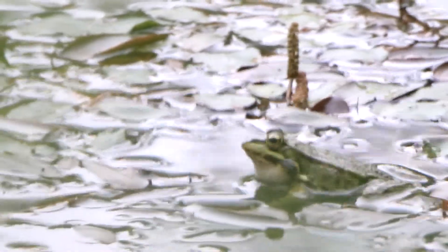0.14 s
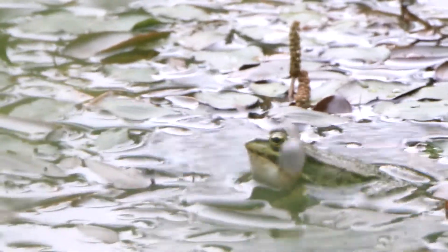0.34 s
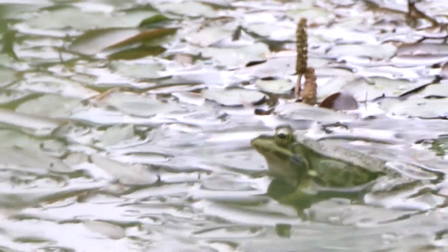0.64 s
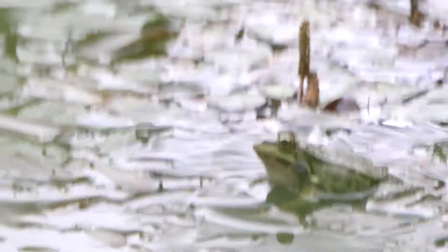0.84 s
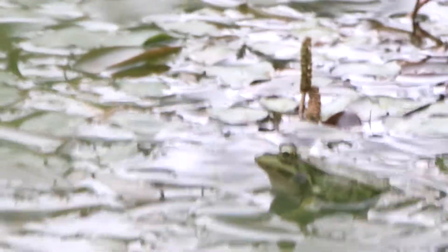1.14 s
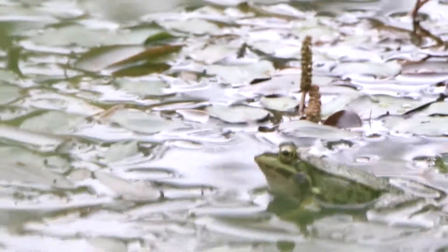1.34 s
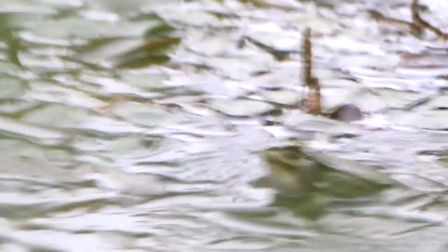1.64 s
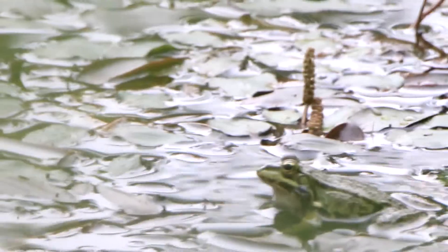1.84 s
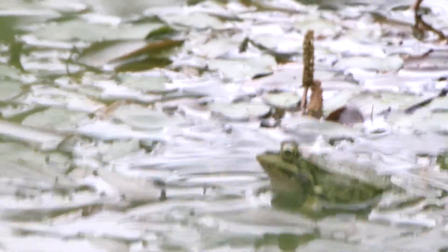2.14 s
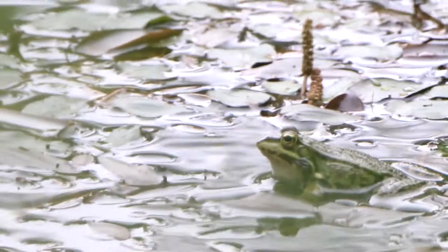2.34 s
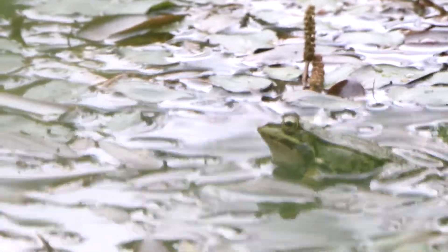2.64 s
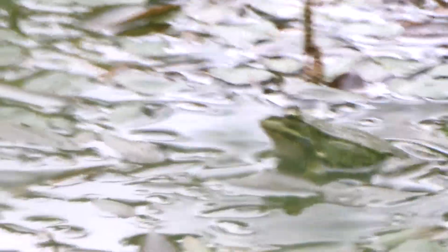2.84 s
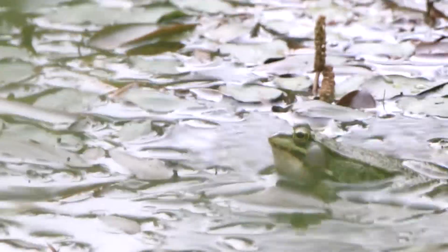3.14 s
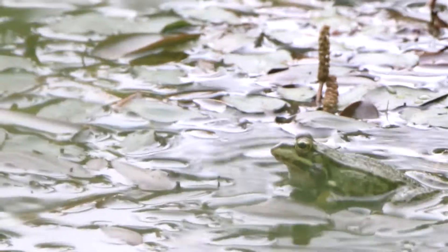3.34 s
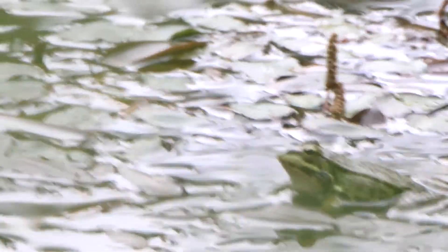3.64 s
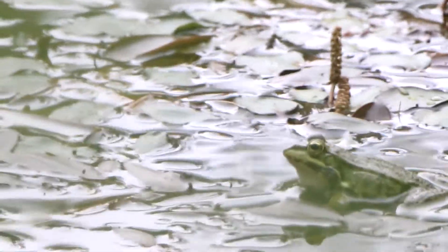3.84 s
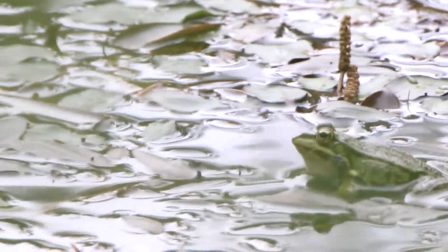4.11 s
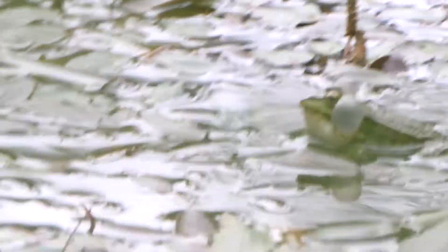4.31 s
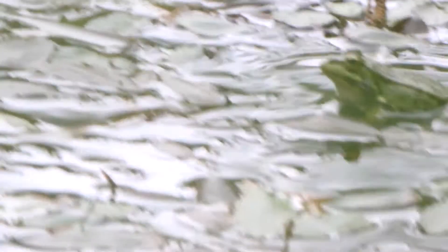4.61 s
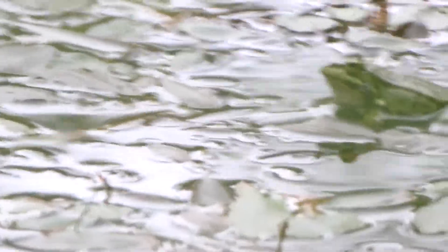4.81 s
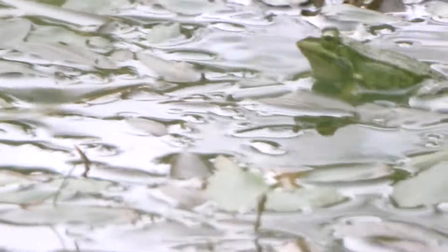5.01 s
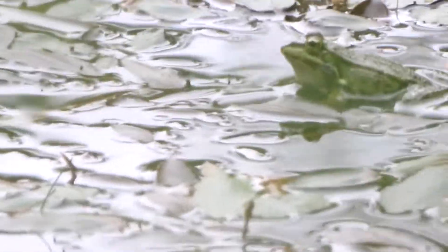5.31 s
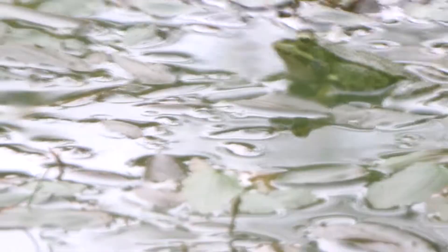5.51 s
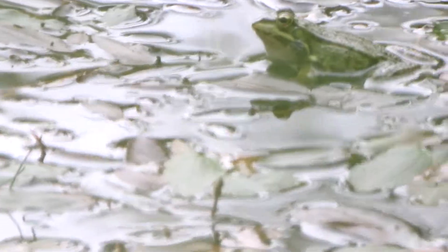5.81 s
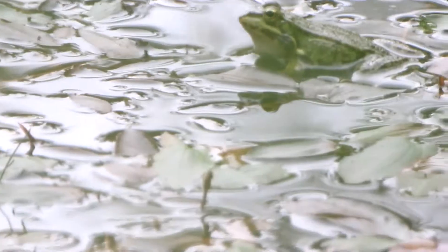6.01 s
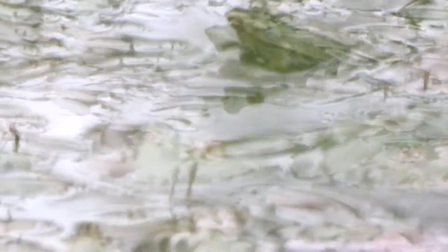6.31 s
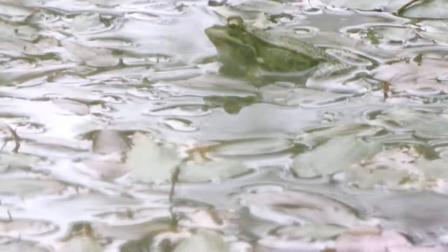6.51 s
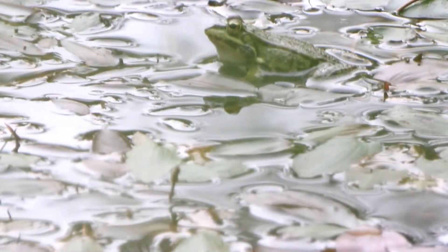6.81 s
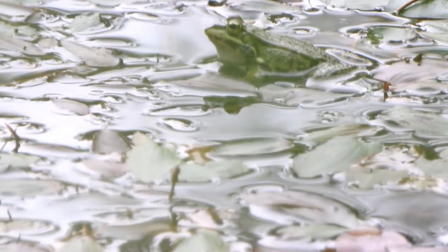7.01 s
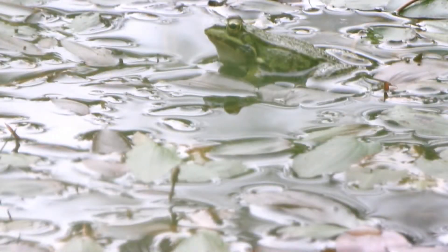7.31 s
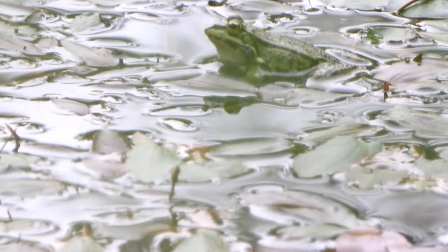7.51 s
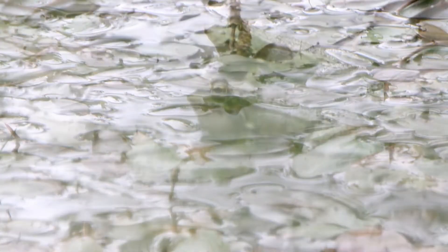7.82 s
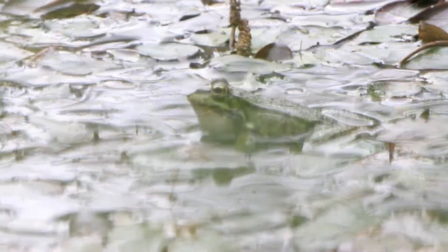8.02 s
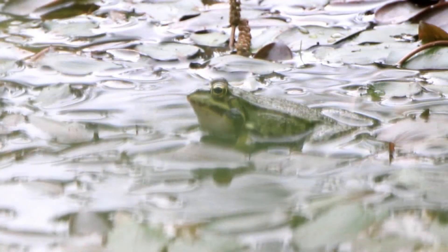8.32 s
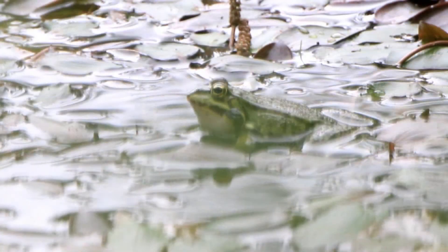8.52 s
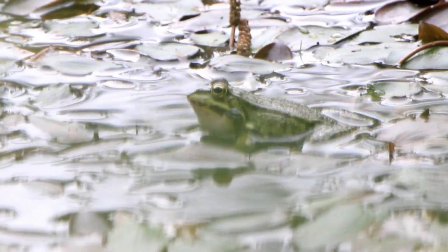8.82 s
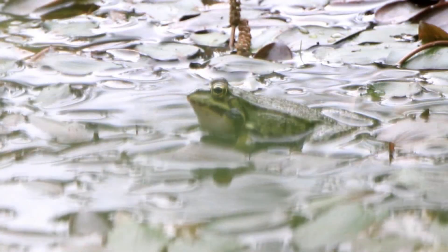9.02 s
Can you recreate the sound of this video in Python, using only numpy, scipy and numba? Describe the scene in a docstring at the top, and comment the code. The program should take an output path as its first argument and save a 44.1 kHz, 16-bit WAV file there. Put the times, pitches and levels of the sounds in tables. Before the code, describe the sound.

Close water frogs rattle in short bursts, each a quick run of throaty, clicking notes that swells and falls. Rough nasal quacks slide between and over them, smaller frogs trill higher and evenly, and low grunts knock constantly beneath. A distant chorus fills the gaps. Outdoor pond, close stereo microphone, short echo from reeds and banks, very faint air.

```python
"""Water frogs call over one another on a weedy pond. Near rattles are arches of beaten notes, each
eight slowing clicks ringing a vocal sac and a throat; smaller frogs rattle higher and evenly.
Quacks are fast pulse trains through a gliding sac resonance; grunts are threes of dull knocks.
A far chorus, ticks and one bubble of water, and faint air fill the gaps.
Decaying noise tails give the short echo of reeds and banks."""
import sys
import numpy as np
from scipy import signal
from scipy.fft import rfft, irfft
from scipy.io import wavfile
from numba import njit

SR = 44100
rng = np.random.default_rng(int(sys.argv[2]) if len(sys.argv) > 2 else 0)


def master(y):
    """Save y as 16-bit WAV."""
    cut = np.clip(np.atleast_2d(y).T, -1, 1)
    pcm = np.round(cut * 32767)  # scale
    wavfile.write(sys.argv[1], SR, pcm.astype(np.int16))


N = 403515

# Quacks. Each row: start, loudest moment and end in seconds, sac resonance at start and at end in Hz,
# relative level in dB, left minus right in dB.
QUACK_CALLS = [(-.04, 0.06, 0.18, 1683, 2060, -21, 2), (0.119, .221, 0.76, 1572, 1920, -31, -2),
               (0.329, 0.41, 0.48, 1207, 2310, -21.5, -3), (1.082, 1.198, 1.364, 1842, 2050, -26, 5),
               (1.467, 1.657, 1.872, 1302, 2130, -23.5, 0), (1.977, 2.091, 2.39, 1612, 1980, -24, 4),
               (2.732, 2.784, 2.93, 1961, 1600, -25.5, -1), (2.9, 3.022, 3.23, 1890, 1700, -34, -8.5),
               (3.117, 3.181, 3.256, 1233, 2390, -22, -0.5), (3.227, 3.372, 3.534, 1594, 1970, -27.5, -6),
               (3.676, 3.79, 3.95, 2187, 1590, -29.5, -6.5), (4.002, 4.087, 4.28, 1691, 2180, -29, 1),
               (4.301, 4.439, 4.465, 1342, 2110, -21, -1.5), (4.449, 4.514, 4.51, 1610, 2000, -16, 0.5),
               (4.769, 4.899, 5.09, 1437, 2114, -30.5, 3), (5.175, 5.262, 5.37, 1947, 1770, -25, 0),
               (5.663, 5.763, 5.81, 1638, 1850, -23, -1), (6.009, 6.159, 6.22, 1808, 1770, -31, -1.5),
               (6.418, 6.475, 6.8, 1535, 2260, -34, -2), (6.829, 6.969, 7.16, 1546, 2250, -31, -0.5),
               (7.171, 7.405, 7.9, 1863, 1870, -32.5, -2), (7.791, 7.889, 8, 1630, 2040, -31, -1.5),
               (8.221, 8.304, 8.42, 1782, 1590, -26.5, -1.5), (8.659, 8.701, 8.73, 2170, 1960, -23, 1),
               (8.992, 9.147, 9.16, 1299, 1900, -26, 0)]
# Higher, even rattles, mostly of smaller frogs; the row at 2.19-2.56 s carries on a near frog's rattle. Each
# row: first and last note in seconds, throat resonance at start and at end in Hz, relative level in dB.
SHRILL_RATTLES = [(0.268, 0.584, 7460, 5800, -34), (1.336, 1.835, 7140, 6700, -31.5),
                  (2.187, 2.556, 6130, 5830, -31), (3.121, 3.239, 7200, 6500, -37.5),
                  (3.531, 3.768, 6650, 6100, -34), (3.979, 4.108, 6840, 6640, -49.5),
                  (4.459, 4.944, 7050, 6960, -31), (6.005, 6.204, 7500, 7200, -35),
                  (6.916, 7.618, 7550, 6800, -35)]
# Loudness of the grunting frogs. Each row: time in seconds, relative level in dB.
GRUNT_LEVELS = [(0, -33.5), (1, -33), (1.4, -43), (2.4, -33), (3.3, -33), (3.95, -39), (5.1, -34),
                (5.5, -40.5), (6.2, -32), (7, -37.5), (8.05, -40), (8.7, -38.5)]
# Ticks of water among the weeds. Each row: time in seconds, level in dB.
WATER_TICKS = [(3.974, -52), (5.022, -49), (5.815, -52), (8.141, -48.5)]
# Spectrum of the still air. Each row: frequency in Hz, relative density in dB per Hz.
AIR_SPECTRUM = [(25, -19.5), (70, 10), (140, 10.5), (220, 5.5), (400, -0.5), (2000, -23), (6000, -10),
                (9000, -13.5), (15000, -22)]
# Colour of the microphone pair, scaled per side. Each row: frequency in Hz, relative left minus right in dB.
PORT_COLOUR = [(1000, -0.5), (1700, 0.5), (2100, -5), (3000, 0), (3800, 1), (4900, 4), (5600, 5.5),
               (6500, 5.5), (8000, 3)]
# Near rattles. Each row: first and last note in seconds, note count, lead of the middle notes on an
# even beat in seconds, fullest moment in seconds, sac resonance when fullest and when slackest in Hz,
# level when fullest and when slackest in dB, throat resonance at start and at end in Hz,
# relative throat level in dB, left minus right in dB.
NEAR_RATTLES = [(.001, .342, 9, 0, .18, 2440, 2250, -22, -23.5, 5160, 5000, -10.5, -2),
                (.396, .636, 8, 0, .6, 2200, 1930, -24, -26, 6400, 6050, -12, -2.5),
                (1.076, 1.248, 5, .002, 1.24, 2420, 2100, -28.5, -29.5, 5600, 5900, -11, 1.5),
                (1.289, 1.631, 9, 0, 1.43, 2780, 2550, -26, -26, 5080, 5060, -5, 1),
                (1.885, 2.153, 9, .004, 2.05, 2720, 2480, -27.5, -32, 6450, 6000, -12, 1),
                (2.015, 2.19, 6, .002, 2.14, 1930, 2100, -22, -24, 5800, 5300, -21, .5),
                (2.229, 2.515, 7, 0, 2.41, 1870, 1790, -25, -25, 4500, 4300, -12, .5),
                (2.575, 2.934, 8, .01, 2.74, 2130, 1940, -23.5, -27, 5900, 5350, -19, .5),
                (3.219, 3.526, 8, 0, 3.47, 2530, 2080, -27.5, -29, 5400, 5000, -9, -5),
                (3.57, 3.79, 6, -.002, 3.62, 2180, 2000, -26.5, -33, 6100, 5600, -21, -2),
                (3.985, 4.253, 9, .008, 4.19, 2520, 2250, -27.5, -30.5, 6550, 5970, -14, 3),
                (4.612, 4.748, 4, 0, 4.63, 1750, 1280, -29, -33, 6000, 6000, -28, -2),
                (4.856, 5.182, 8, .007, 4.98, 2370, 2000, -26.5, -32, 5320, 5150, -10.5, -.5),
                (5.336, 5.528, 5, .002, 5.45, 2090, 1950, -28.5, -30.5, 5800, 5670, -14, 1),
                (5.598, 5.966, 12, .013, 5.84, 2600, 2100, -33, -37, 6100, 6000, -27, -4),
                (6.061, 6.453, 9, .002, 6.2, 2720, 2420, -30.5, -34, 6000, 5900, -25, -6.5),
                (6.326, 6.817, 12, .002, 6.73, 2270, 1290, -25.5, -32, 6400, 5400, -22, -2.5),
                (6.918, 7.393, 11, .002, 7.24, 2480, 1800, -20, -29, 5450, 5000, -12, -1.5),
                (7.46, 7.843, 10, .001, 7.77, 2550, 1500, -24.5, -31, 5400, 5000, -9, -1),
                (7.885, 7.968, 3, 0, 7.89, 2000, 2130, -22.5, -30, 4850, 4500, -9, 0),
                (8.003, 8.387, 9, 0, 8.23, 2480, 2170, -22, -28, 5950, 5400, -11, 0),
                (8.5, 9.066, 14, .009, 8.9, 2610, 2320, -24.5, -35, 4900, 4880, -4.5, 1)]
# Tone curves. Each row: frequency in Hz, gain in dB.
QUACK_TONE = [(300, -32.5), (430, -12), (560, 15), (2300, -1.5), (3700, -8.5), (5800, 2), (8500, -10.5)]
FAR_TONE = [(2400, 1), (3400, -1.5)]
AIR_SIDE_TONE = [(150, -10), (600, -16.5), (4000, -22.5)]
# Mean click sizes of a note in dB, last click first.
CLICK_SIZES_DB = np.array([-2.0, -1.0, 0.0, -1.0, -7, -15.5, -14.5, -12.5])

TOP_HZ = 15700
FRAME = 4096
HZ = np.fft.rfftfreq(FRAME, 1 / SR) + 1e-3  # offset avoids division by zero
END_HURRY = 0.0252  # crowds the first and last notes of a rattle
QUACK_BASE_HZ, QUACK_PULSES_PER_SAC_HZ = 198.9, .15  # a tauter sac goes with faster pulses
NOTE_SCATTER_DB, NOTE_SCATTER_PITCH = 0.83, 0.027  # standard deviations; pitch as a share
CRISP_DB = -47.5  # click top of the loudest rattle, before the note is levelled


def undb(db):
    """Decibels to gain."""
    return 10 ** (np.asarray(db) / 20)


def level(x, db):
    """Scale to an rms level."""
    return x * undb(db) / np.sqrt(np.mean(x ** 2))


def curve(table, t):
    """Interpolate the columns of a table at time t."""
    s, *columns = np.transpose(table)
    return [np.interp(t, s, c) for c in columns]


def colour(x, points, power=1):
    """Filter by (Hz, dB) points, interpolated over log frequency."""
    f, db = np.transpose(points)
    bins_hz = np.arange(N + 1) * SR / (2 * N)
    gain_db = power * np.interp(np.log(bins_hz + 1), np.log(f), db)
    return irfft(rfft(x, 2 * N) * undb(gain_db))[..., :N]


def ring(hz, width_hz):
    """Response of one resonance, 1 at its centre."""
    return 1 / (1 + 1j * (HZ ** 2 - hz ** 2) / (HZ * width_hz))


def roll_off(hz, kind, order):
    """Response of a Butterworth low-pass or high-pass."""
    return signal.freqs(*signal.butter(order, 1, kind, analog=True), HZ / hz)[1]


def clicks(times_s, sizes):
    """Spectrum of a few clicks around the middle of a frame."""
    return sizes @ np.exp(-2j * np.pi * np.outer(times_s + FRAME / SR / 2, HZ))


def add(out, s, sound, db, pan_db=0, lasts_s=0.022):
    """Mix in a sound centred on s, at its rms level while it lasts, with a pan-dependent port delay."""
    sound = sound / np.sqrt(np.sum(sound ** 2) / (SR * lasts_s))
    lag = int(round(3.3 + .9 * min(pan_db, 0)))  # samples, right behind left
    for port, side in enumerate((1, -1)):
        at = int(s * SR) - len(sound) // 2 + np.arange(len(sound)) + port * lag
        inside = (at >= 0) & (at < N)
        out[port, at[inside]] += undb(db + side * pan_db / 2) * sound[inside]


@njit
def moving_ring(x, hz, width_hz):
    """State-variable band-pass whose centre moves."""
    y, b, l = np.empty(len(x)), 0., 0.
    for i in range(len(x)):
        g, k = np.tan(np.pi * hz[i] / SR), width_hz / hz[i]
        v = (b + g * (x[i] - l)) / (1 + g * (g + k))
        b, l, y[i] = 2 * v - b, l + 2 * g * v, k * v
    return y


def note(sac_hz, throat_hz, throat_db, crisp=0, last_gap_s=.0047, slowing=.8, last_click_s=.0054,
         sac_width_hz=250, throat_width_hz=260, dulling_db=1.57):
    """Clicks that slow down and swell ring the sac and the throat; the late, slow ones are duller."""
    # counted backwards from the last click
    gaps_s = last_gap_s * slowing ** np.arange(7) * (1 + .07 * rng.standard_normal(7))
    times_s = last_click_s - np.r_[0, np.cumsum(gaps_s)]
    sizes = undb(CLICK_SIZES_DB + 2.1 * rng.standard_normal(8))
    throat_sizes = sizes * undb(dulling_db * np.arange(8))
    struck = clicks(times_s, sizes)

    sac = ring(sac_hz, sac_width_hz) * roll_off(0.42 * sac_hz, "low", order=1)
    sac = sac + undb(-33.5) * ring(694, 100)
    throat = undb(throat_db - 13.5) * ring(throat_hz, throat_width_hz)
    voice = sac * struck - throat * clicks(times_s, throat_sizes)
    voice = voice * roll_off(1.046 * throat_hz, "low", order=7) * roll_off(550, "high", order=4)
    top = crisp * struck * roll_off(5500, "high", order=2) * roll_off(12000, "low", order=3)
    return irfft(voice + top)


def banks(x, t60_s=0.29):
    """Scattered echoes from reeds and banks: decaying noise, different at each ear."""
    t = np.arange(SR // 2) / SR
    tail = rng.standard_normal((2, len(t))) * undb(-60 * t / t60_s) * (t > .006)
    tail /= np.sqrt(np.sum(tail ** 2, axis=1, keepdims=True))
    return signal.fftconvolve(x.mean(0)[None], tail, axes=1)[:, :N]


def air(air_db=-60):
    """Shaped noise: a faint low rumble under a thin hiss, nearly alike in both ears."""
    mid, side = rng.standard_normal((2, N))
    side = colour(side, AIR_SIDE_TONE)
    return level(colour(mid + side * np.array([[1], [-1]]), AIR_SPECTRUM), air_db)


def water():
    """Ticks are decaying noise bursts; one bubble is a sine that glides up as it bursts."""
    out = np.zeros((2, N))
    t = np.maximum(np.arange(FRAME) - FRAME // 2, 0) / SR
    for s, db in WATER_TICKS:
        burst = rng.standard_normal(FRAME) * (t > 0) * np.exp(-t / .0008)
        tick = irfft(rfft(burst) * ring(7500, 5000) * roll_off(8000, "low", order=3))
        add(out, s, tick, db)
    bubble = np.sin(2 * np.pi * (2900 * t + 28000 * t ** 2)) * t * np.exp(-t / 0.0021)
    add(out, 1.031, bubble, -45, -6)
    return out


def far_chorus(count=40, far_db=-49):
    """Twelve-note rattles from across the pond, dulled by the distance."""
    out = np.zeros((2, N))
    for k in range(count):
        when, size, tempo, side = rng.uniform(-1, 1, 4)
        start_s = (k - 1 + when / 2) * N / SR / (count - 1)
        gap_s = .045 + .005 * tempo
        for n, arch in enumerate(np.sin(np.linspace(0, np.pi, 12))):
            sound = note(1750 + 200 * size + 350 * arch, 6000 + 600 * size, -17.5)
            add(out, start_s + n * gap_s, sound, far_db + 4 * arch, 5 * side)
    return colour(out, FAR_TONE)


def grunts(count=340, gap_s=.0075, grunt_db=-4):
    """Frogs among the weeds grunt in threes of low, dull knocks on three body resonances."""
    out = np.zeros((2, N))
    for k in range(count):
        s, chance = (k + rng.random()) * N / SR / count, rng.standard_normal(10)
        body = ring(570 * np.exp(0.074 * chance[0]), 89)
        body = body - 0.86 * ring(1200 * np.exp(0.27 * chance[1]), 250)
        body = body + 0.91 * ring(1900 * np.exp(0.25 * chance[2]), 220)
        body = body * roll_off(532, "high", order=7) * roll_off(1680, "low", order=5)
        times_s = gap_s * (np.arange(3) - 1 + .1 * chance[3:6])
        knocks = clicks(times_s, undb(3.5 * chance[6:9]))
        add(out, s, irfft(body * knocks), curve(GRUNT_LEVELS, s)[0] + grunt_db, 4.5 * chance[9])
    return out


def quacks(edge_db=-16, sac_width_hz=280, throb_hz=31, throb_db=3, throb_lean=0.35,
           throat_first_hz=6400, throat_last_hz=5500, throat_db=-25,
           rate_rise=.15, rough=0.6, sac_swing=0.088):
    """Pulses, quickest at full effort, ring a gliding sac; each throb swells slowly and drops fast."""
    out = np.zeros((2, N))
    for start, top, end, first_hz, last_hz, db, pan_db in QUACK_CALLS:
        rate_hz = QUACK_BASE_HZ + QUACK_PULSES_PER_SAC_HZ * first_hz
        t = np.arange(int(start * SR), int(end * SR)) / SR
        chance = rng.standard_normal((256, 2))
        effort = 1 - np.interp(t, [start, top, end], [-1, 0, 1]) ** 2
        throb = 2 * np.pi * throb_hz * (t - top)

        cycles = np.cumsum(rate_hz * (1 + rate_rise * (effort - 1))) / SR
        at = np.searchsorted(cycles, np.cumsum(np.exp(.17 * rough * chance[:, 0])))
        pulses = np.bincount(at, undb(3 * rough * chance[:, 1]), len(t))[:len(t)]

        sac_hz = np.linspace(first_hz, last_hz, len(t)) * (1 + sac_swing * np.sin(throb))
        throat_hz = np.linspace(throat_first_hz, throat_last_hz, len(t))
        voice = moving_ring(moving_ring(pulses, sac_hz, float(sac_width_hz)), sac_hz, 3300.0)
        voice = voice + undb(-15.0) * moving_ring(pulses, np.full(len(t), 630.), 130.0)
        voice = voice - undb(throat_db) * moving_ring(pulses, throat_hz, 170.0)

        swell_db = edge_db * (1 - effort)
        swell_db = swell_db + throb_db * (np.cos(throb) + throb_lean * np.sin(2 * throb))
        voice = level(voice, db - 1.5) * undb(swell_db) * signal.windows.tukey(len(t), .12)
        voice_db = 10 * np.log10(np.mean(voice ** 2))
        add(out, (start + end) / 2, voice, voice_db, pan_db, end - start)
    return colour(out, QUACK_TONE)


def shrill_frogs(sac_hz=2880, throat_db=-8.0):
    """Higher rattles in an even rhythm, trailed by their echo: mostly smaller frogs further off, with one near
    frog's rattle carried on."""
    out = np.zeros((2, N))
    for start, end, first_hz, last_hz, db in SHRILL_RATTLES:
        count = round((end - start) * 25) + 1  # about 25 notes per second
        throats_hz = np.linspace(first_hz, last_hz, count)
        for s, throat_hz in zip(np.linspace(start, end, count), throats_hz):
            sound = note(sac_hz, throat_hz, throat_db, last_gap_s=0.0042, throat_width_hz=450)
            add(out, s, sound, db - 5.0, 1.5)
    return out + undb(0.5) * banks(out, t60_s=0.5)


def rattles():
    """Near frogs: effort arches the sac's pitch and the level, while the throat slides."""
    out = np.zeros((2, N))
    loudest_db = max(row[7] for row in NEAR_RATTLES)
    for (start, end, count, ahead_s, fullest, full_hz, slack_hz, full_db, slack_db,
         first_hz, last_hz, throat_db, pan_db) in NEAR_RATTLES:
        u = np.linspace(-1, 1, count)
        times = start + (end - start) * (1 + u + END_HURRY * u * (1 - u ** 2)) / 2
        times = times - ahead_s * (1 - u ** 2)
        slack = ((times - fullest) / max(fullest - start, end - fullest)) ** 2
        chance = rng.standard_normal((count, 2))

        sacs_hz = full_hz + slack * (slack_hz - full_hz)
        sacs_hz = sacs_hz * (1 + NOTE_SCATTER_PITCH * chance[:, 0])
        throats_hz = np.linspace(first_hz, last_hz, count)
        levels_db = full_db + slack * (slack_db - full_db) + NOTE_SCATTER_DB * chance[:, 1]
        crisp = undb(CRISP_DB) * (full_db == loudest_db)
        for s, sac_hz, throat_hz, db in zip(times, sacs_hz, throats_hz, levels_db):
            add(out, s, note(sac_hz, throat_hz, throat_db, crisp), db, pan_db)
    return out


def scene():
    """Near frogs come almost dry; the far chorus mostly by way of the banks."""
    near, around, far = rattles() + water(), quacks() + grunts(), far_chorus()
    echo = undb(-10) * banks(near, t60_s=.18) + undb(-11) * banks(around, t60_s=.2)
    distance = undb(1) * far + undb(2) * banks(far, t60_s=.5)
    return near + around + shrill_frogs() + echo + distance + air()


def record(dry):
    """Two ports colour the sound differently; the strongest peaks are rounded, and the top is cut."""
    heard = np.array([colour(dry[0], PORT_COLOUR, 0.26), colour(dry[1], PORT_COLOUR, -0.69)])
    ceiling = 0.48
    heard = heard / (1 + (heard / ceiling) ** 6) ** (1 / 6)
    return signal.sosfilt(signal.ellip(8, .2, 80, TOP_HZ, fs=SR, output="sos"), heard)


dry = scene()
out = record(dry)
master(out)
```